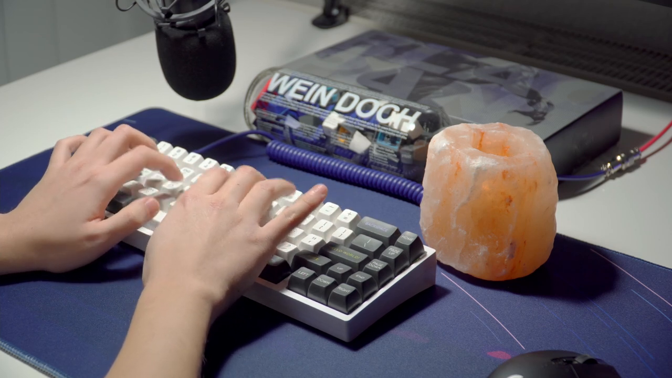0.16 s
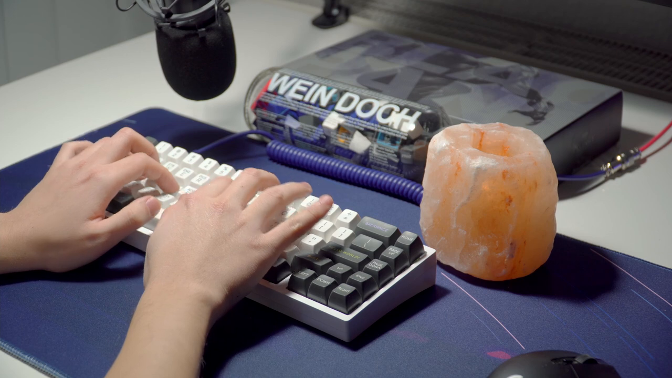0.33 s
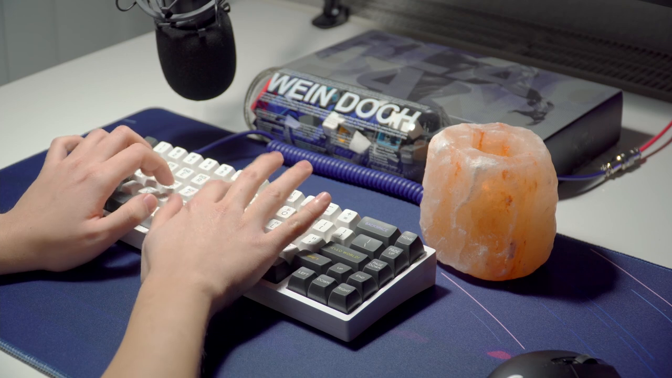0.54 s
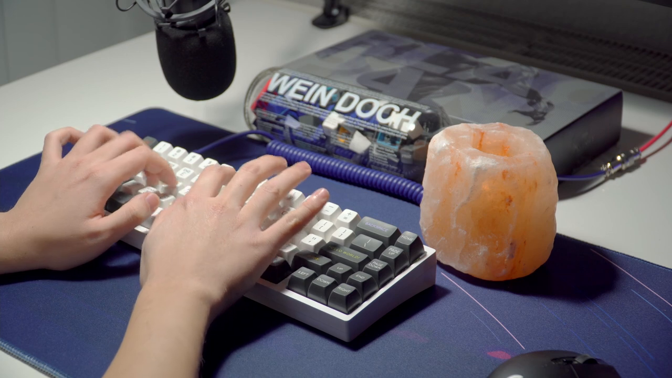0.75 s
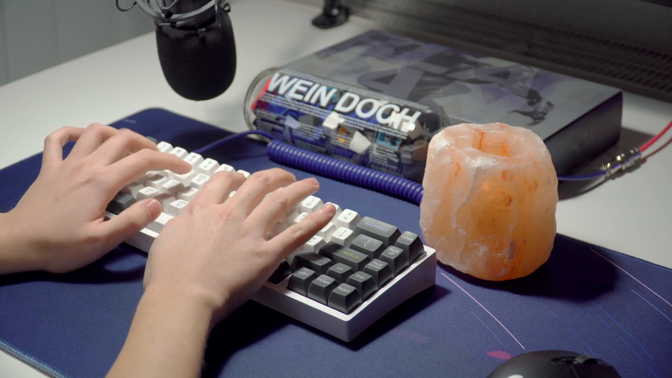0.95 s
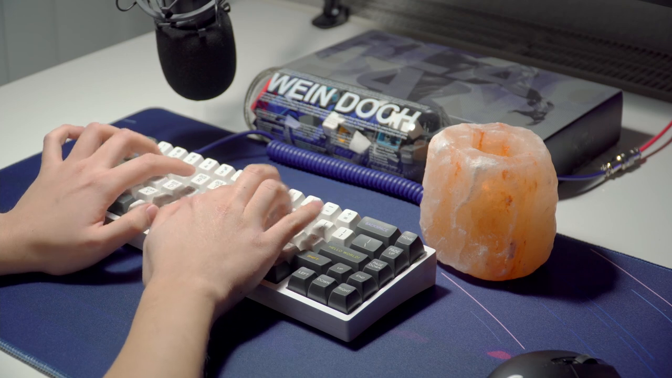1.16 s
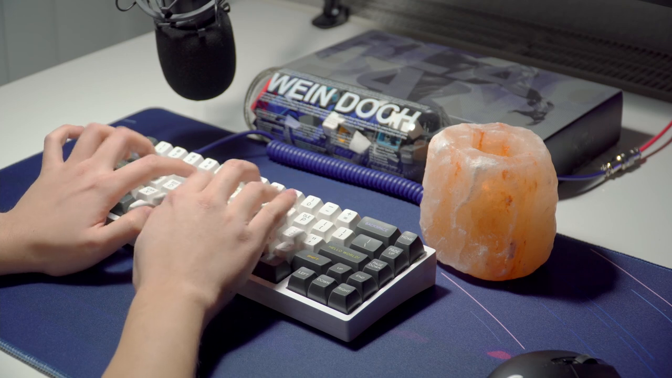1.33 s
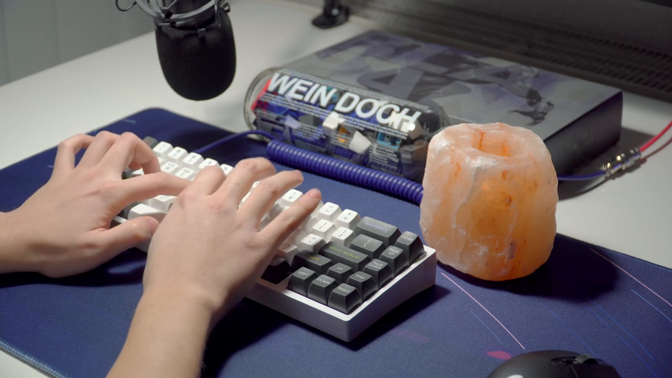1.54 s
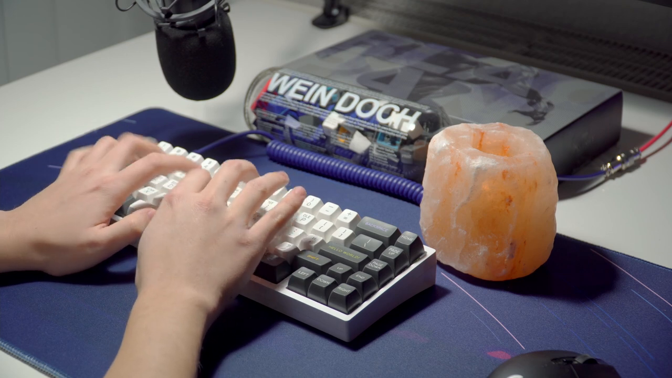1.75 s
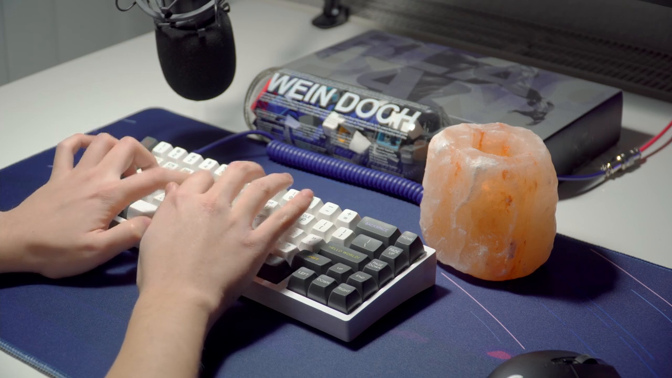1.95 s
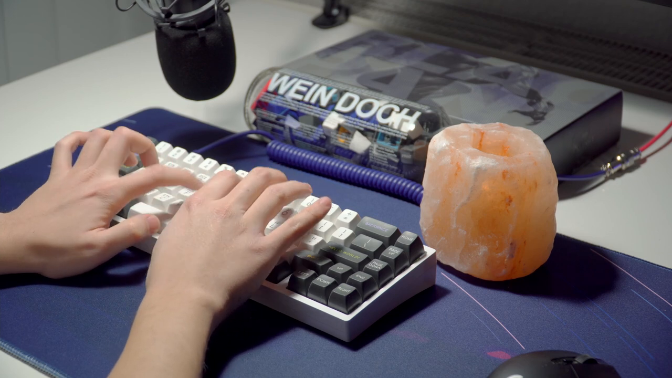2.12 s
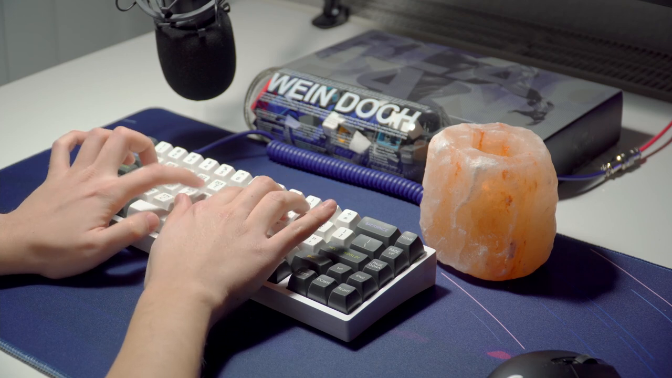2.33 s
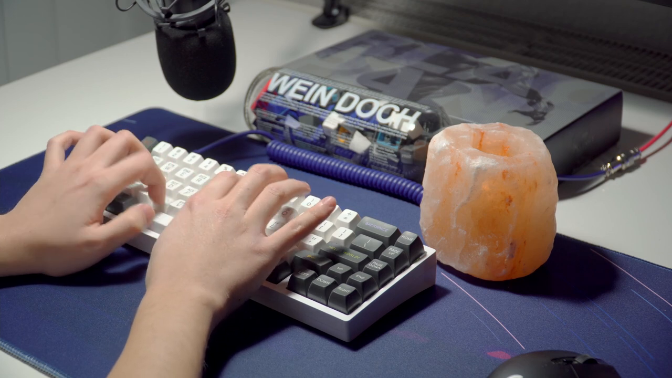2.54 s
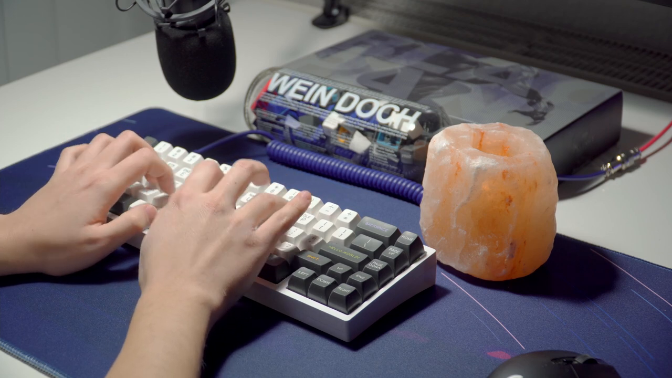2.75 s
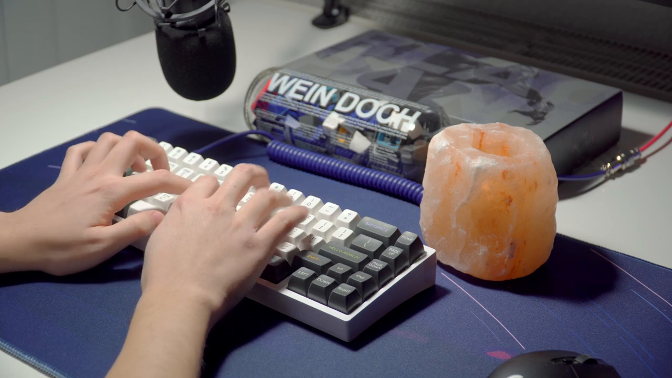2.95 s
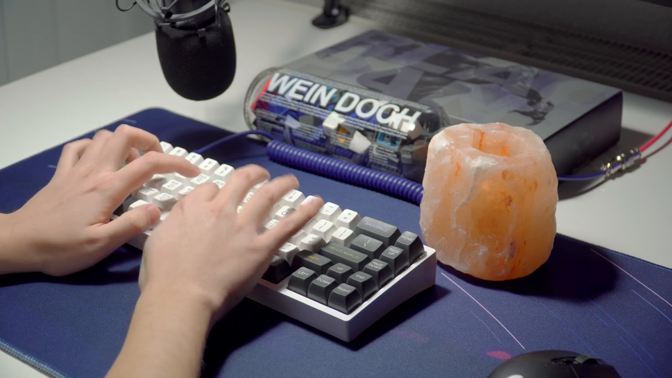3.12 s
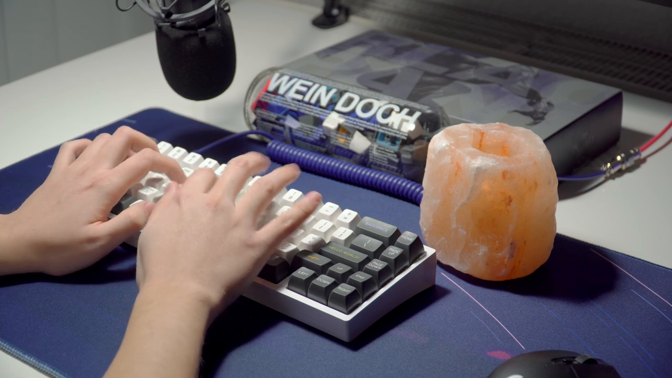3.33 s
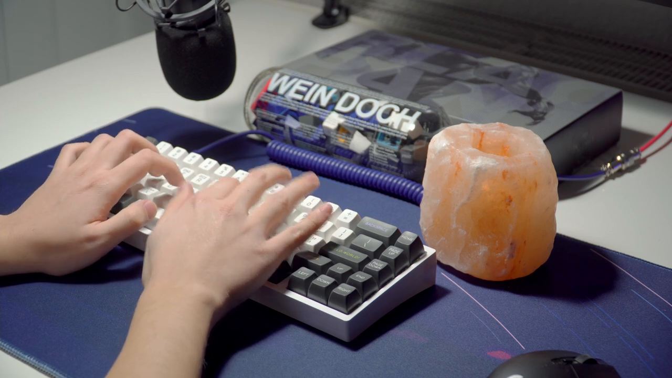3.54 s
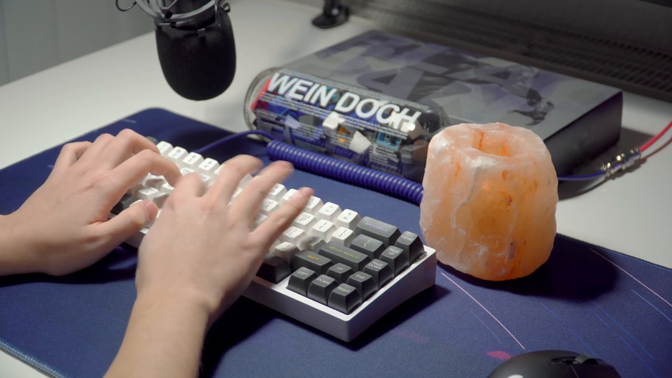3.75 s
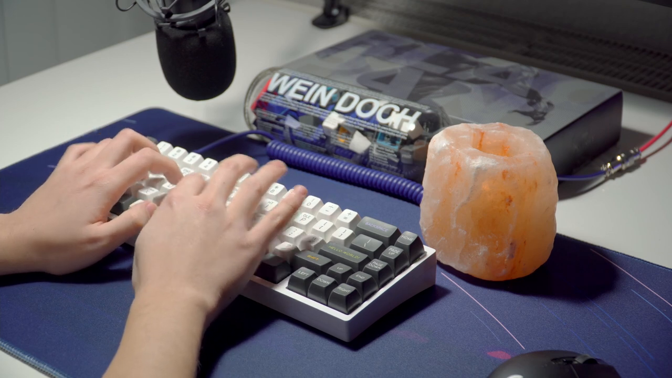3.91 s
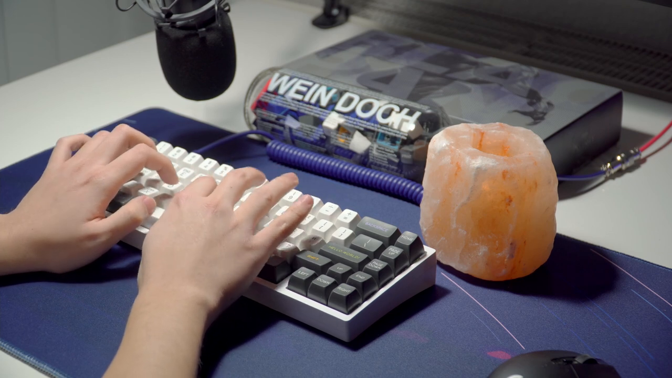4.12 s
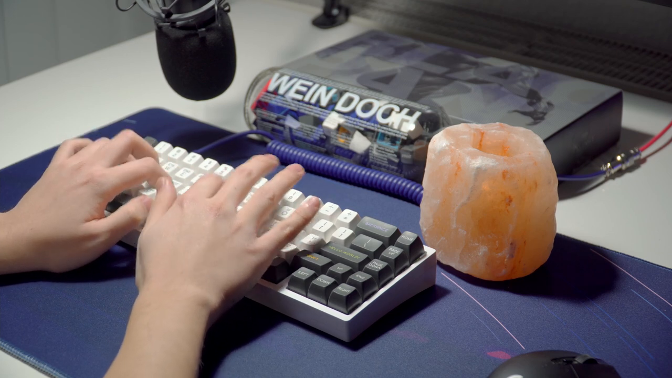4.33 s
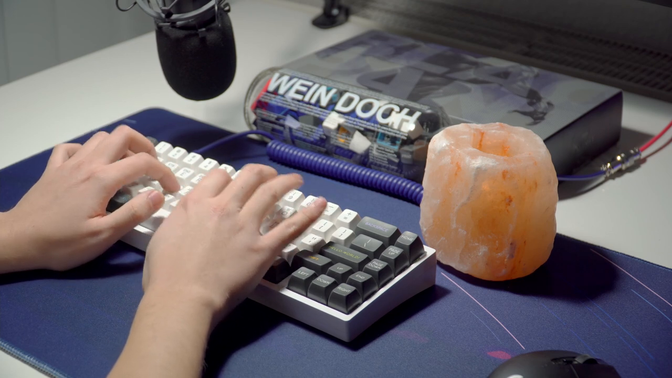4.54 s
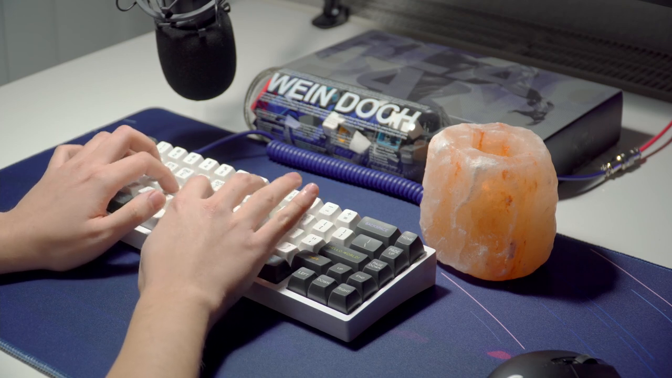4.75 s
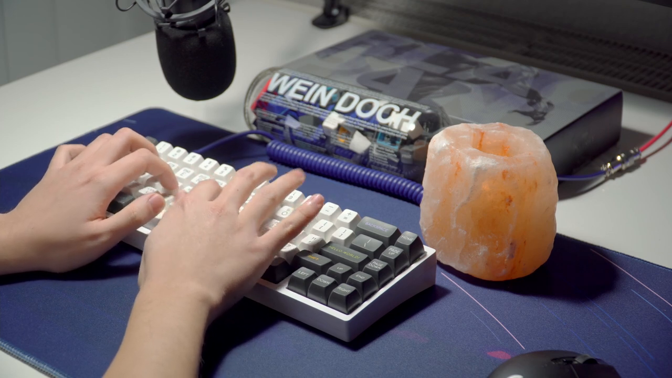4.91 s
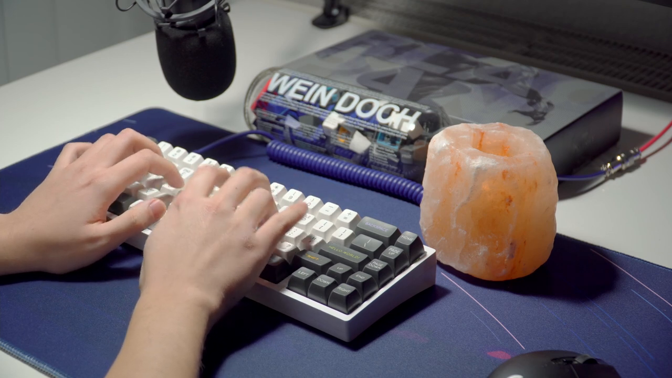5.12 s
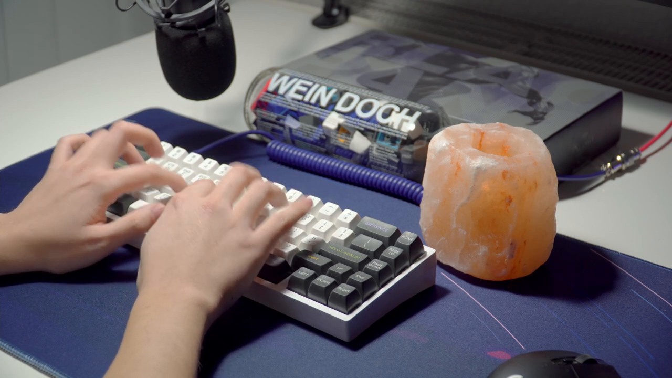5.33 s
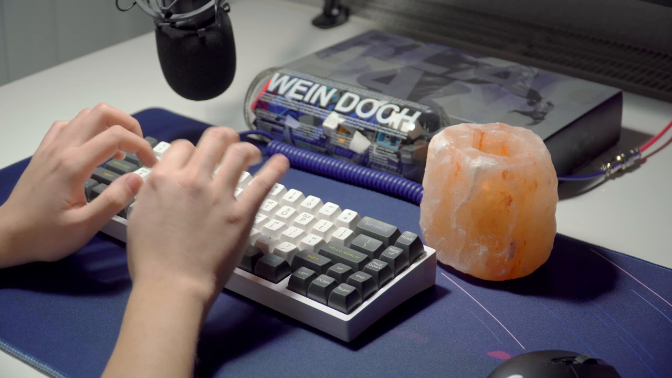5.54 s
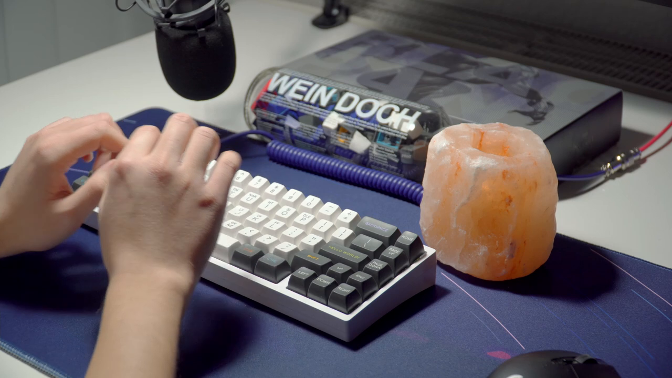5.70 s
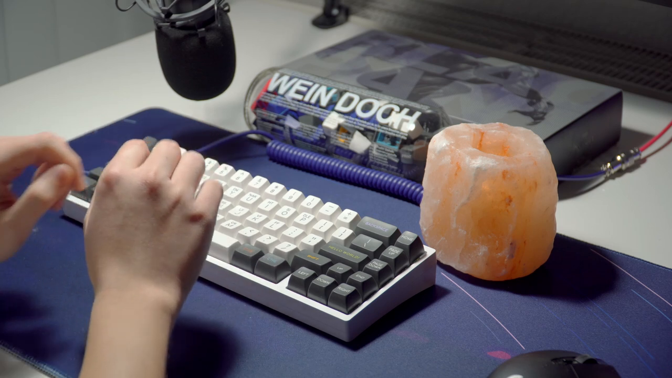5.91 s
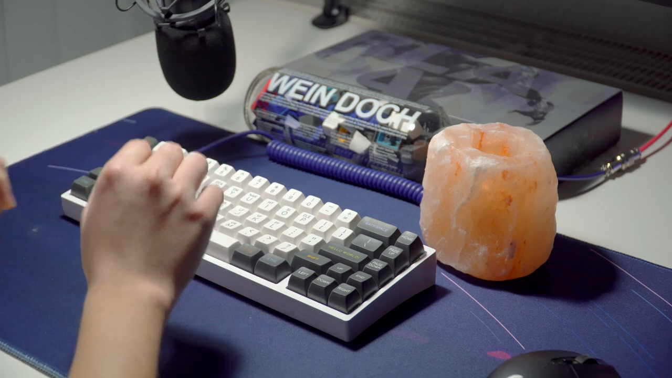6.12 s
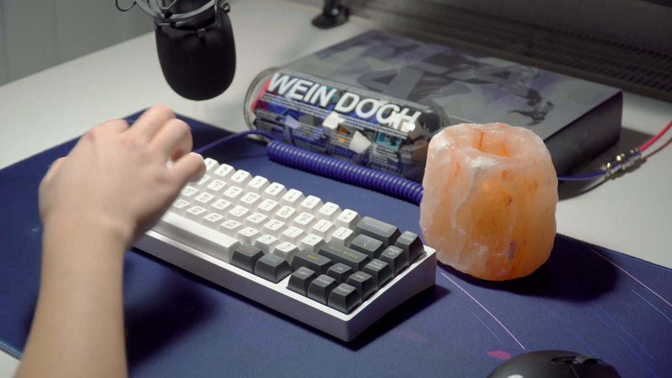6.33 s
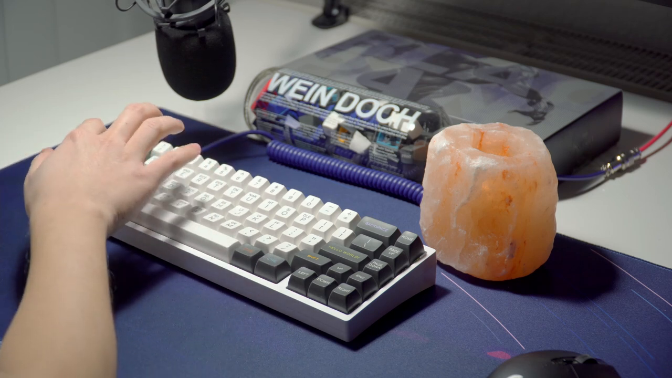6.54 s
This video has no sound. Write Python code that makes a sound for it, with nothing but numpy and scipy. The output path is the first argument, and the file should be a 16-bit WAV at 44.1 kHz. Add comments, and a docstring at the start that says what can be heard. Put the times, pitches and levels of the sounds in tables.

```python
"""Fast typing on a mechanical keyboard, heard at a microphone on an arm, which ends before the background does.
Impacts excite the keycap and switch of each key as it lands or springs back, and the case rings briefly.
The space bar strikes end after end, pings as a sum of modes and rattles; soft hiss leads each stroke, fingertips tap.
The desk thuds through its mat, the microphone arm rocks at its resonance, and a small room reflects the keys.
Underneath, steady tones beat as a faint hum over soft noise."""
import sys
import numpy as np
from scipy import signal
from scipy.fft import rfft, irfft
from scipy.io import wavfile

SR = 44100
rng = np.random.default_rng(int(sys.argv[2]) if len(sys.argv) > 2 else 0)


def store_wav(level_fs):
    """Save 16-bit WAV to argv[1]."""
    pcm = np.round(np.clip(np.atleast_2d(level_fs), -1, 1) * 32767)
    wavfile.write(sys.argv[1], SR, pcm.T.astype(np.int16))


N = 289737

# letter keys landing or springing back: start_s, level_db (rms over 1 ms), pitch_hz (keycap),
# brightness_db (clack against thock)
KEY_STROKES = [(0.0093, -14.0, 1750.0, 0.5), (0.0781, -11, 1900.0, -4), (0.1272, -19, 1740, -13.0),
               (0.2603, -12.5, 2240, 11), (0.3558, -11.5, 2050.0, 9), (0.3913, -15, 2000.0, 5.5),
               (0.405, -24, 2070.0, -7), (0.479, -22.5, 1844, -11.5), (0.488, -18.5, 2200.0, -0.5),
               (0.5661, -11, 2200.0, 1), (0.667, -24, 1800.0, -26), (0.725, -13, 2150.0, 16),
               (0.7926, -14, 2150.0, 2.5), (0.8943, -10.5, 1950.0, 9), (0.9444, -18, 1850.0, -15.0),
               (1.0608, -9, 2100.0, 15.5), (1.136, -23, 2330.0, -14), (1.1472, -11, 1750.0, 4),
               (1.2381, -12.0, 2210, -3), (1.2658, -12.0, 1910, 2.5), (1.2761, -16.5, 1720, -11.0),
               (1.3259, -22, 2000.0, -8), (1.3348, -18, 1920, -14.5), (1.4, -15, 2820, -1.5),
               (1.4417, -8.5, 2000.0, 9), (1.495, -19, 2750.0, -14.0), (1.5225, -11.5, 2430, 4),
               (1.6439, -21, 2400.0, -18), (1.68, -18.5, 2700.0, -5.5), (1.7498, -3.5, 1710, 14),
               (1.8599, -9, 2670, -3.0), (1.8721, -16, 1740, -26), (1.9619, -7.5, 1950.0, 12),
               (2.0397, -10, 2290, 8), (2.0905, -18.5, 2440, -1), (2.136, -16, 2200.0, -8.0),
               (2.2429, -9, 2250.0, 6), (2.2988, -16, 1785, -7), (2.3232, -20, 2450.0, -23),
               (2.368, -18, 2200.0, -3), (2.4163, -31, 1850.0, -16), (2.423, -4, 1800.0, 14.5),
               (2.4726, -19.5, 1924, -12.5), (2.5146, -23.5, 2360.0, 1), (2.5712, -24, 2244, 15),
               (2.5878, -13.5, 2450.0, 6), (2.699, -4.5, 2000.0, 3.5), (2.7695, -21, 2107, -9.5),
               (2.8416, -9.5, 1950.0, -1.5), (2.893, -10.5, 2670, -3.5), (2.9503, -12.5, 2190, 1),
               (2.973, -24, 2070.0, -5), (3.0212, -15.5, 2700.0, 9), (3.0536, -16.5, 2390, -10.5),
               (3.117, -6.5, 1736, 7.5), (3.1903, -6.5, 1790, 16.5), (3.212, -21.5, 1750.0, -28),
               (3.2844, -24.5, 1790.0, -31), (3.297, -14.5, 2660, -4.0), (3.3549, -13, 2440, -5),
               (3.434, -9, 2103, 5), (3.5, -16.5, 2250.0, -10.5), (3.5895, -11.0, 1890, 10),
               (3.8401, -11, 2620, 1.5), (3.9247, -6.5, 1900, 10.5), (4.01, -22.5, 1850.0, -26.5),
               (4.132, -12.5, 2720, 5.5), (4.217, -19.5, 2600.0, -17), (4.275, -12, 2150.0, 10),
               (4.3072, -15, 2000.0, 6), (4.3521, -7.5, 2750.0, 11.5), (4.407, -21.5, 1878, -24.5),
               (4.4578, -11.5, 2000.0, 8.5), (4.5426, -22.5, 1930, 2.5), (4.5638, -5.5, 2145, 11.5),
               (4.6393, -19, 2100.0, 4.5), (4.6637, -12.5, 1960, -2.5), (4.7327, -16, 2234, 1.5),
               (4.7406, -21.5, 1950.0, -10), (4.79, -12, 2610, 1), (4.8762, -19.0, 2680, -7),
               (4.935, -8, 2000.0, 11), (5.112, -11, 2293, 2.5), (5.1879, -18.5, 2300, -3),
               (5.2308, -7, 1850.0, 15.5), (5.2529, -9.5, 2225, 13.5), (5.33, -22.5, 1833, -48),
               (5.369, -8.5, 2550, 6.5), (5.3753, -12.5, 2300, -2.0), (5.4419, -16, 2280, -7.5)]
# space bar landing or springing back: start_s, strength_db, pitch_hz (keycap)
BAR_STROKES = [(0.1523, -13, 1960), (0.187, -22, 2000), (0.655, -10.5, 2470), (0.7646, -17, 2180),
               (0.9701, -6.0, 2480), (1.0516, -16, 2170), (1.5737, -8.5, 2260), (2.1096, -12.0, 2150.0),
               (2.2087, -18.5, 1750.0), (2.5513, -9.5, 2670), (3.027, -6, 2440), (3.152, -15.5, 2060),
               (3.675, -6.5, 2280), (3.7172, -25.5, 2330), (4.0422, -8.5, 2300), (4.1089, -15.0, 1950),
               (4.5194, -14, 2190), (4.5871, -14.5, 2080), (5.026, -12, 2040)]
# spectrum of a letter key's impact: pitch_hz, level_db
KEY_IMPACT = [(150, -15), (400, -5), (700, -1.5), (1000, 4.5), (1400, -5.5), (2000, -3.5), (2600, -3),
              (3200, -8), (4300, -6), (5000, -13.5), (6200, -26), (9000, -22.5), (12000, -30), (16000, -37)]
ORDINARY_DB = -14  # strength of an ordinary stroke


def amp(db):
    """Decibel law: a level becomes an amplitude gain."""
    return 10 ** (np.asarray(db) / 20)


def force(db):
    """Energy and level: the gain that gives a sound of energy 1 this rms level over 1 ms."""
    return amp(db) * np.sqrt(SR / 1000)


def unit(x):
    """Energy normalisation: scales the sum of squares to 1."""
    return x / np.sqrt(np.sum(x ** 2) + 1e-20)


def follow(rule, change_db):
    """Straight-line law: a base level plus a share of the change."""
    base_db, share = rule
    return base_db + share * change_db


def read(points, hz):
    """Logarithmic pitch scale: joins (pitch_hz, value) points by lines on it."""
    point_hz, value = np.transpose(points)
    return np.interp(np.log(hz + 1), np.log(point_hz + 1), value)


def add(mix, s, sound):
    """Superposition: adds a sound into the mix at time s."""
    part = mix[max(round(s * SR), 0):][:len(sound)]
    part += sound[:len(part)]


def stroke_times():
    """Event times: when any key lands or returns, in seconds."""
    return np.array([row[0] for row in list(KEY_STROKES) + list(BAR_STROKES)])


def causal(gain_db):
    """Minimum phase: the most compact pulse that has this spectrum, by folding the cepstrum."""
    cepstrum = irfft(gain_db * np.log(10) / 20)
    half = len(cepstrum) // 2
    cepstrum[1:half] *= 2
    cepstrum[half + 1:] = 0
    return irfft(np.exp(rfft(cepstrum)))


def dying(colour, t60, size, count=12):
    """High modal density: noise stands for a cloud of modes, and each band decays at its own rate."""
    hz, t = np.fft.rfftfreq(size, 1 / SR), np.arange(size) / SR
    spectrum = amp(read(colour, hz)) * np.exp(2j * np.pi * rng.random(len(hz)))
    centres = np.geomspace(t60[0][0], t60[-1][0], count)
    # overlapping triangular bands that add up to the whole spectrum
    bands = [irfft(spectrum * read(np.c_[centres, share], hz)) for share in np.eye(count)]
    decay_db = -60 * t / read(t60, centres)[:, None]
    return unit(np.sum(bands * amp(decay_db), 0))


def click(shape, cap_hz, bright_db, grit_db=0.0, size=2048):
    """Impact excitation: plate thock, keycap resonance, switch clack and tick, a little different each time."""
    # how each part follows brightness: base_db, share_db_per_db
    thock_rule = (-1.85, -0.3)
    clack_rule = (-1.8, 0.57)
    tick_rule = (-0.8, .15)
    # bending waves are dispersive: pitch_hz, delay_s
    bending = [(900, 0.00072), (1700, 0.00052), (3000, 0.00059)]
    cap_db, cap_width_hz = 8.5, 350
    uneven_db, grit_s = 2.37, 0.0011

    hz, t = np.fft.rfftfreq(size, 1 / SR), np.arange(size) / SR
    thock_db, clack_db, tick_db = (follow(rule, bright_db) for rule in (thock_rule, clack_rule, tick_rule))
    touch = [(1100, thock_db), (1500, 0), (2900, 0), (3500, clack_db), (5000, clack_db), (6200, tick_db)]
    keycap = cap_db / (1 + ((hz - cap_hz) / cap_width_hz) ** 2)
    knots = np.geomspace(300, 16000, 44)
    own = uneven_db * np.interp(hz, knots, rng.standard_normal(len(knots)))
    blow = rfft(causal(read(shape, hz) + read(touch, hz) + keycap + own))
    # the loose stem chatters for a moment, which smears the treble
    chatter = rfft(unit(rng.standard_normal(size) * np.exp(-t / grit_s)))
    loose = amp(grit_db) * read([(3000, 0.2), (6500, 0.68), (13000, 1.5)], hz)
    smear = (1 + loose * chatter) / np.sqrt(1 + loose ** 2)
    # summing the delay over frequency gives the phase
    travel = np.exp(-2j * np.pi * np.cumsum(read(bending, hz)) * hz[1])
    pulse = np.roll(irfft(blow * travel * smear), 8)
    fade_out = np.cos(np.pi / 2 * t / t[-1]) ** 2
    return unit(pulse * fade_out)


def case_ring(blow, rise_s=0.0016):
    """Convolution with a structural response: the blow spreads through plate and case and dies away."""
    # what the case gives back of a click: pitch_hz, level_db
    case_colour = [(200, 1.5), (420, -0.5), (520, -5), (750, 4.5), (850, -12), (960, 5.5), (1500, -2),
                   (2200, -8.5), (3200, -2), (4400, -12), (9000, 0.5), (15000, -8.5)]
    # its decay: pitch_hz, t60_s
    case_decay = [(250, 0.061), (1000, 0.036), (2500, 0.025), (9000, 0.016)]
    response = dying(case_colour, case_decay, size=3072, count=4)
    response *= 1 - np.exp(-(np.arange(len(response)) / SR / rise_s) ** 2)
    return unit(signal.fftconvolve(blow, response))


def letter_keys(ring_vary_db=0.2):
    """Impact and resonance: each stroke clicks and rings the case; soft ones chatter and ring relatively more."""
    # how ring and stem chatter follow strength: base_db (ordinary stroke), share_db_per_db
    ring_rule = (-24, 0.7)
    chatter_rule = (4.3, -0.61)
    out = np.zeros(N)
    for s, db, cap_hz, bright_db in KEY_STROKES:
        harder_db = db - ORDINARY_DB
        blow = click(KEY_IMPACT, cap_hz, bright_db, grit_db=follow(chatter_rule, harder_db))
        ring_db = follow(ring_rule, harder_db) + ring_vary_db * rng.standard_normal()
        add(out, s, force(db) * blow)
        add(out, s, force(ring_db) * case_ring(blow))
    return out


def ping(detune=0.0033, uneven_db=2, size=11000):
    """Modal synthesis: decaying sines for the long bar and its stabiliser wire, ringing on after the blow."""
    # modes before random variation: pitch_hz, level_db, t60_s
    modes = [(404.5, 3.5, 0.026), (651, -19.5, .12), (823, -14.5, 0.084), (1940, -3.5, 0.067),
             (2000, -3, 0.11), (2700, -8.5, .07), (2780, -21.5, 0.24), (3500, -17.5, 0.19),
             (5170, -30.5, .2), (5650, -27.5, .2), (5780, -30.5, .2), (9300, -32, .12)]
    hz, db, t60 = np.transpose(modes)[:, :, None]
    pitch, strength, turn = rng.standard_normal((3, len(hz), 1))
    t = np.arange(size) / SR
    fade = np.exp(-np.log(1000) * t / t60)
    tones = np.sin(2 * np.pi * (hz * (1 + detune * pitch) * t + turn))
    return unit(np.sum(amp(db + uneven_db * strength) * fade * tones, 0))


def wire_rattle():
    """Dense decaying noise: the stabiliser wire rattles in its clips."""
    # spectrum: pitch_hz, level_db
    rattle_colour = [(200, -4.5), (650, 5.5), (1000, 1), (1500, 5.5), (2400, 0.5), (3300, -5.5),
                     (4500, -15), (5600, -12), (6700, -26.5), (9500, -26), (16000, -31)]
    # decay: pitch_hz, t60_s
    rattle_decay = [(400, .12), (2500, 0.096), (9000, 0.29)]
    return dying(rattle_colour, rattle_decay, size=8192, count=3)


def space_bar(click_db=-1, far_end_db=-3, lag_s=0.001088, case_db=-13.5, rattle_db=-2.5):
    """Double impact: the bar lands on one end, then the other, pings and rattles; harder is brighter."""
    # spectrum of the bar's impact: pitch_hz, level_db
    bar_impact = [(150, -6), (450, -14), (780, 7.5), (1250, -14.5), (1600, -19), (1920, 3), (2300, -17.5),
                  (2850, -3.5), (3500, -3), (4500, -12), (7000, -20.5), (9700, -18.5), (12000, -25.5),
                  (16000, -36.5)]
    # how ring and brightness follow strength: base_db (ordinary stroke), share_db_per_db
    ring_rule = (-23.5, 1)
    bright_rule = (-0.6, 1)
    out = np.zeros(N)
    for s, db, cap_hz in BAR_STROKES:
        harder_db = db - ORDINARY_DB
        ring_db = follow(ring_rule, harder_db)
        near, far = (click(bar_impact, cap_hz, follow(bright_rule, harder_db)) for end in range(2))
        add(out, s, -force(db + click_db) * near)
        add(out, s + lag_s * rng.uniform(0.71, 1.5), force(db + click_db + far_end_db) * far)
        add(out, s, force(db + case_db) * case_ring(near))
        add(out, s, force(ring_db) * ping())
        add(out, s, force(ring_db + rattle_db) * wire_rattle())
    return out


def hiss_before(hiss_db=-51, lead_s=0.0063, length_s=0.0022, vary_db=5, grain_db=3, uneven_db=4, size=2048):
    """Noise bursts: short soft treble hiss just before each stroke, each coloured anew."""
    # spectrum of the hiss: pitch_hz, level_db
    hiss_colour = [(300, -9), (1000, -7.5), (2400, 5), (4000, 4), (6500, -14), (9500, -7), (13500, -8),
                   (16000, -27.5)]
    out = np.zeros(N)
    t, hz = (np.arange(size) - size / 2) / SR, np.fft.rfftfreq(size, 1 / SR)
    knots = np.geomspace(1000, 16000, 20)
    for s in stroke_times():
        grains = rng.standard_normal(size) * amp(grain_db * np.minimum(rng.exponential(1, size), 5))
        own = uneven_db * np.interp(hz, knots, rng.standard_normal(len(knots)))
        hiss = irfft(rfft(grains) * amp(read(hiss_colour, hz) + own))
        swell = np.exp(-(t / (length_s * rng.uniform(0.56, 2.9))) ** 2)
        start_s = s + t[0] - lead_s * rng.uniform(0, 1.9)
        level = amp(hiss_db + vary_db * rng.standard_normal())
        add(out, start_s, level * swell * hiss / hiss.std())
    return out


def finger_taps(tap_db=-35, vary_db=2.0, bright_vary_db=6, count=30):
    """Weak impacts: fingertips brush and jiggle keycaps just before some of the strokes."""
    out = np.zeros(N)
    for s in rng.choice(stroke_times(), count, replace=False):
        blow = click(KEY_IMPACT, rng.uniform(1800, 2700), bright_vary_db * rng.standard_normal(), grit_db=6.0)
        touch = force(tap_db + vary_db * rng.standard_normal())
        touched = s - rng.uniform(0.015, 0.037)
        add(out, touched, touch * blow)
        add(out, touched, touch * 0.5 * case_ring(blow))
    return out


def desk(spread_s=0.042, rise_s=0.003):
    """Structure-borne sound: strokes send a dull thud through the mat into the desk top, heavier when harder."""
    # desk spectrum: pitch_hz, level_db
    desk_colour = [(25, -12.5), (48, -0.5), (75, -4.5), (105, -4.5), (135, 3.5), (175, -18), (240, -10),
                   (330, -13.5), (600, -34.5)]
    # desk decay: pitch_hz, t60_s
    desk_decay = [(50, .3), (135, .3), (200, .16), (400, 0.076)]
    # how the thud follows strength: base_db (ordinary stroke), share_db_per_db
    thud_rule = (-43, 0.65)
    # heavier bumps of a hand on the desk: start_s, level_db
    hand_bumps = [(2.423, -35)]
    out = np.zeros(N)
    strokes = list(KEY_STROKES) + list(BAR_STROKES)
    thuds = [(s, follow(thud_rule, db - ORDINARY_DB)) for s, db, *_ in strokes]
    for s, thud_db in thuds + list(hand_bumps):
        thud = dying(desk_colour, desk_decay, size=12288, count=4)
        thud *= 1 - np.exp(-np.arange(len(thud)) / SR / rise_s)
        add(out, s, amp(thud_db) * np.sqrt(spread_s * SR) * thud)
    return out


def arm_sway(sway_hz=21.63, width_hz=3.4):
    """Low resonance: narrow-band noise for the rocking microphone arm, along a given level curve."""
    # level curve of the rocking: start_s, level_db
    sway_curve = [(0.0, -33.5), (0.38, -27.5), (0.46, -39.5), (1.39, -23.5), (2.91, -35.5), (3.019, -27),
                  (5.89, -33), (6.57, -54)]
    hz = np.fft.fftfreq(N, 1 / SR)
    band = -((hz - sway_hz) / width_hz) ** 2 / 2
    rocking = np.fft.ifft(np.exp(band + 2j * np.pi * rng.random(N)))
    # dividing by the envelope evens out the noise's own swells
    power = abs(rocking) ** 2
    rocking = rocking.real / np.sqrt(power + 0.12 * np.mean(power))
    level_db = np.interp(np.arange(N) / SR, *np.transpose(sway_curve))
    return amp(level_db) * unit(rocking) * np.sqrt(N)


def room(x, tail_db=-16, early_db=-21.0, early_s=0.0115, early_width_s=0.0011, build_s=0.014, dull=0.35, count=6):
    """Room response: near-wall reflections, then a reverberant tail; strokes take turns among several paths."""
    # tail spectrum: pitch_hz, level_db
    room_colour = [(150, -2), (500, 2), (1000, -2.5), (1600, 0), (2500, -1), (4200, -7.5), (6500, -1),
                   (10000, -2), (15000, 2.5)]
    # tail decay: pitch_hz, t60_s
    room_decay = [(200, 0.4), (1000, 0.59), (2500, 0.44), (5000, 0.55), (12000, 0.4)]
    out = np.zeros(N)
    # the path changes 2 ms ahead of each stroke
    place = np.searchsorted(np.sort(stroke_times()) - 0.002, np.arange(N) / SR) % count
    for k in range(count):
        tail = dying(room_colour, room_decay, size=24576, count=6)
        t = np.arange(len(tail)) / SR
        tail = unit(tail * (1 - np.exp(-(t / build_s) ** 2)))
        early = unit(rng.standard_normal(len(t)) * np.exp(-((t - early_s) / early_width_s) ** 2))
        early = signal.lfilter([1 - dull], [1, -dull], early)
        response = amp(tail_db) * tail + amp(early_db) * early
        out += signal.fftconvolve(x * (place == k), response)[:N]
    return out


def background(air_db=-58.5):
    """Beating: mains hum against a fan's tone, over soft room noise."""
    # steady tones: pitch_hz, level_db (rms)
    hum_tones = [(120, -53.5), (131.3, -56.5), (216, -85)]
    # noise spectrum: pitch_hz, level_db
    air_colour = [(25, 5), (55, -5.5), (85, -14.5), (160, -19), (230, -10), (320, -20), (540, -19.5),
                  (750, -30), (1500, -34.5), (4000, -43.5), (9000, -43.5), (16000, -44.5)]
    t, hz = np.arange(N) / SR, np.fft.rfftfreq(N, 1 / SR)
    hum = sum(np.sqrt(2) * amp(db) * np.sin(2 * np.pi * (f * t + rng.random())) for f, db in hum_tones)
    spectrum = rfft(rng.standard_normal(N)) * amp(read(air_colour, hz))
    # air_db is the rms level of the noise above 200 Hz
    above_hum = irfft(spectrum * (hz > 200), N)
    return hum + amp(air_db) * irfft(spectrum, N) / above_hum.std()


def scene():
    """Superposition: keyboard, room, desk, arm and background at one microphone."""
    keyboard = letter_keys() + space_bar() + hiss_before() + finger_taps()
    return (keyboard + room(keyboard) + desk() + arm_sway() + background())[None]


def record(dry, ceiling=0.93, edge_hz=16000):
    """Clipping and band limiting: peaks stop at the ceiling, then a low-pass filter removes the top."""
    low_pass = signal.firwin(255, edge_hz, window=("kaiser", 9), fs=SR)
    return signal.oaconvolve(np.clip(dry, -ceiling, ceiling), low_pass[None], "same")


dry = scene()
out = record(dry)
store_wav(out)
```